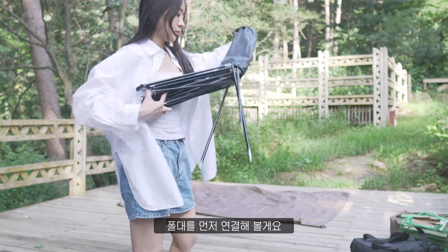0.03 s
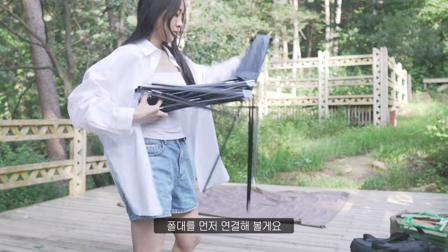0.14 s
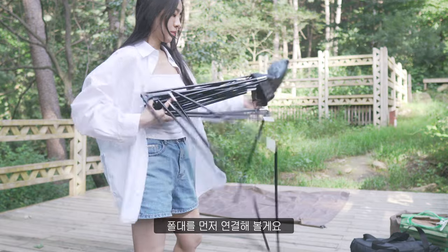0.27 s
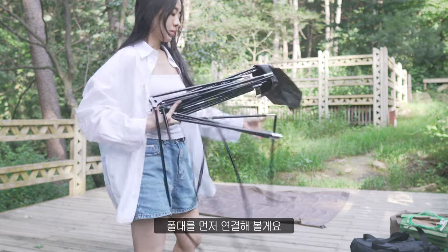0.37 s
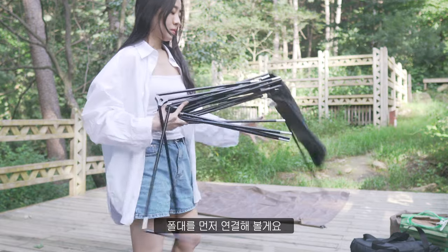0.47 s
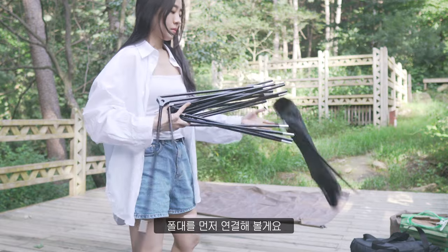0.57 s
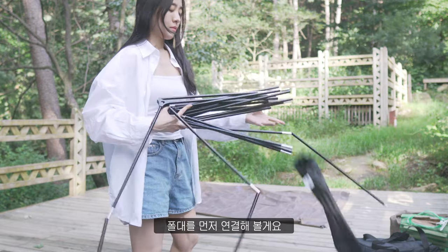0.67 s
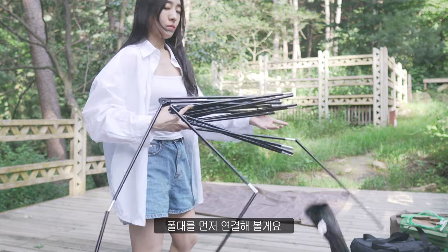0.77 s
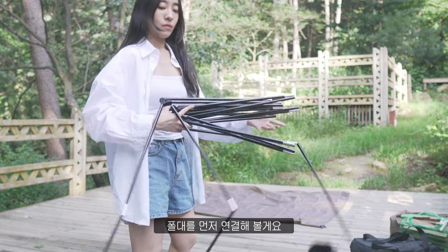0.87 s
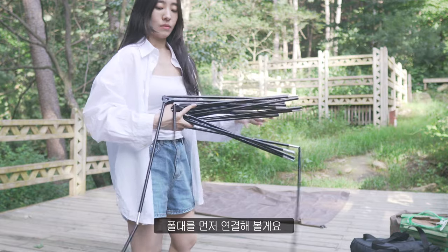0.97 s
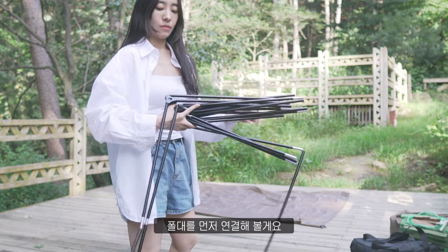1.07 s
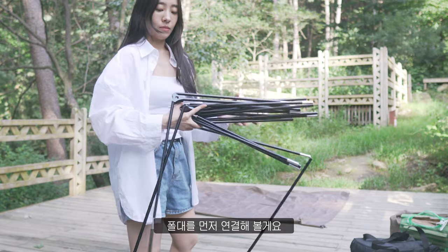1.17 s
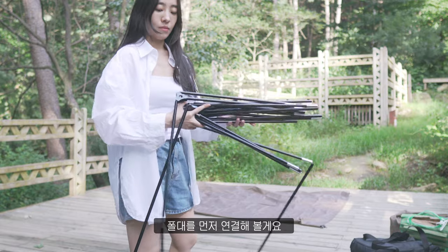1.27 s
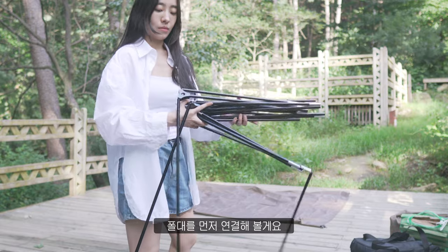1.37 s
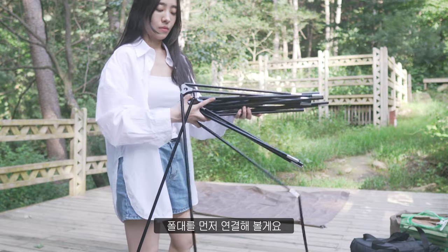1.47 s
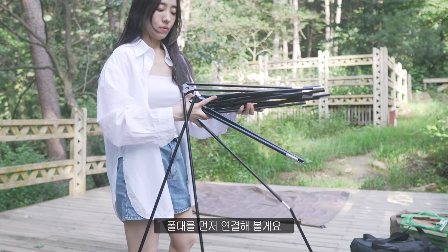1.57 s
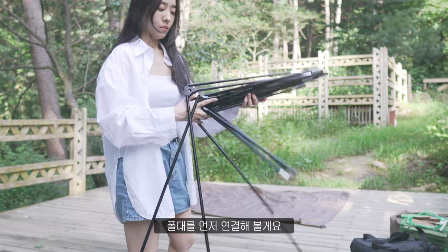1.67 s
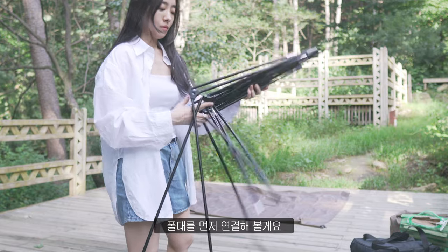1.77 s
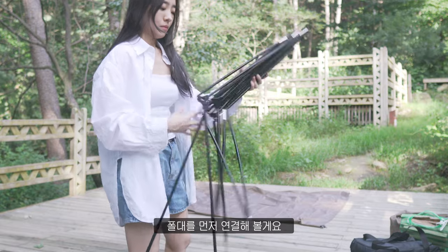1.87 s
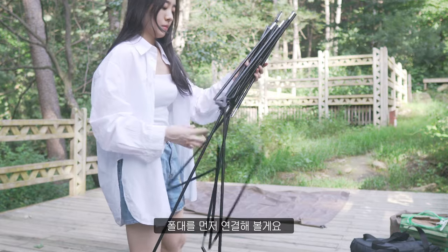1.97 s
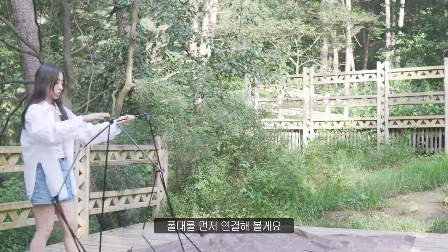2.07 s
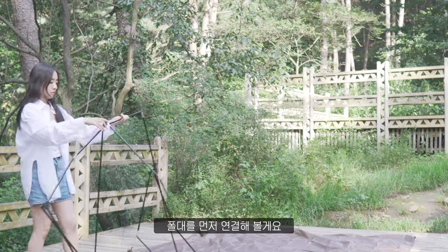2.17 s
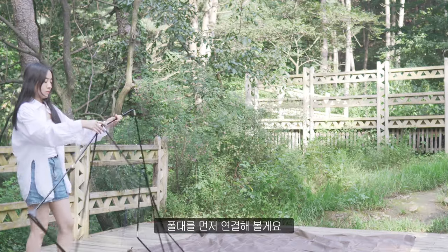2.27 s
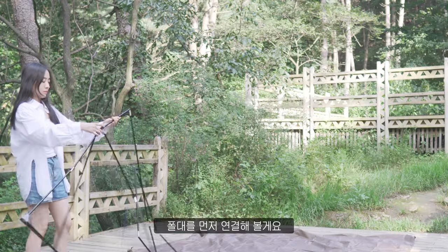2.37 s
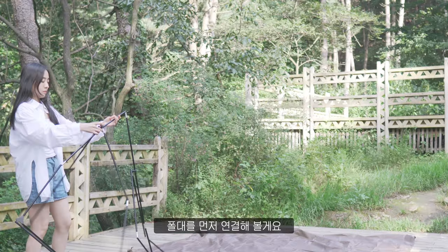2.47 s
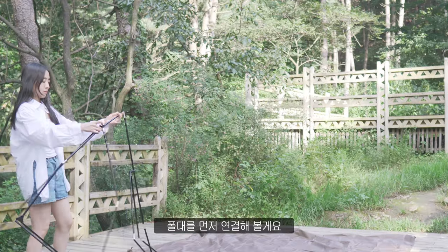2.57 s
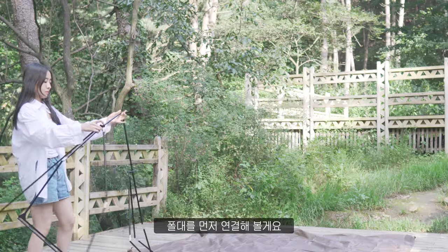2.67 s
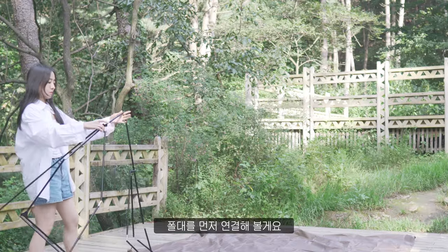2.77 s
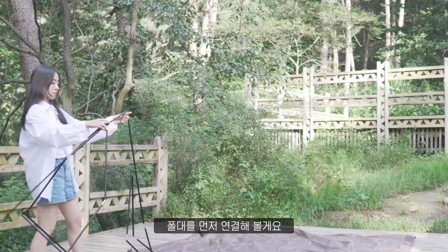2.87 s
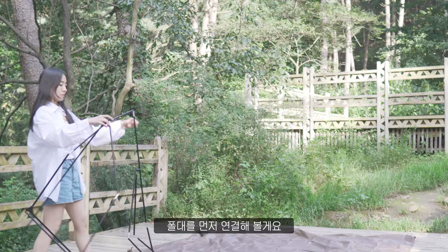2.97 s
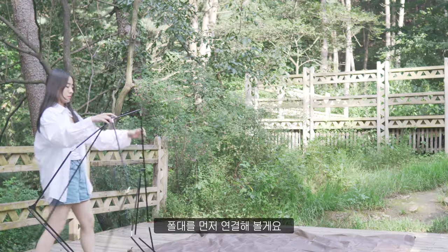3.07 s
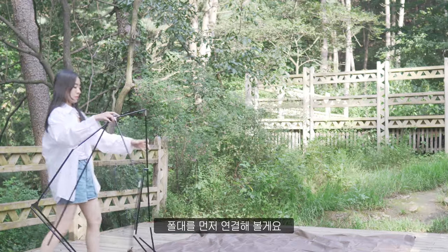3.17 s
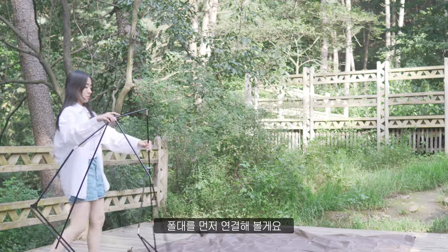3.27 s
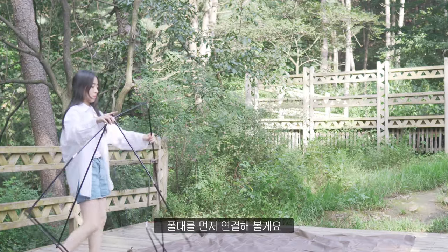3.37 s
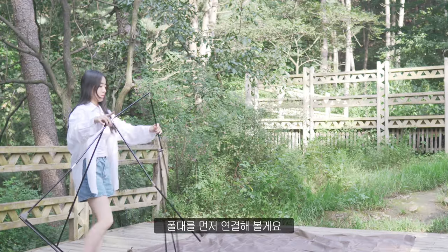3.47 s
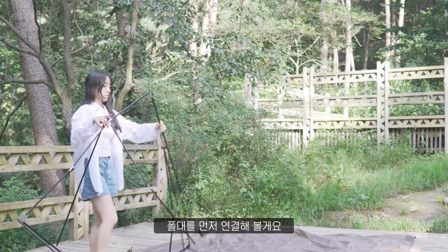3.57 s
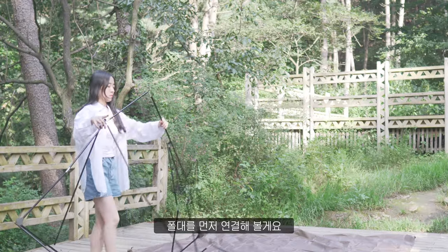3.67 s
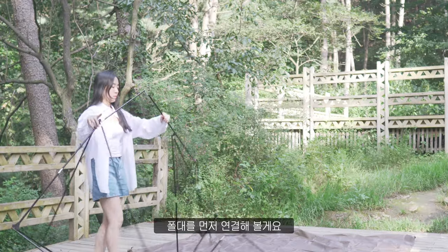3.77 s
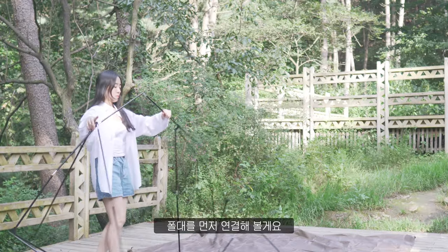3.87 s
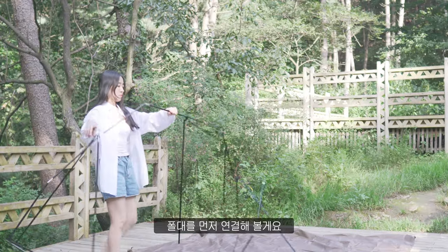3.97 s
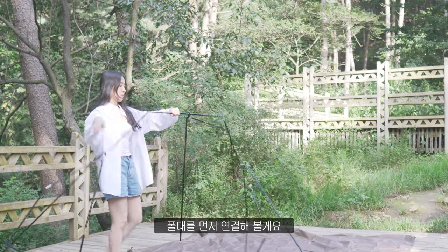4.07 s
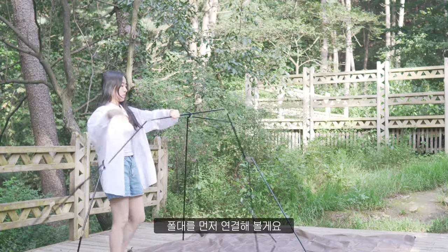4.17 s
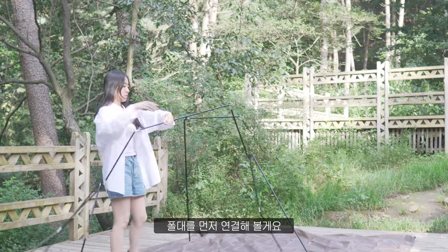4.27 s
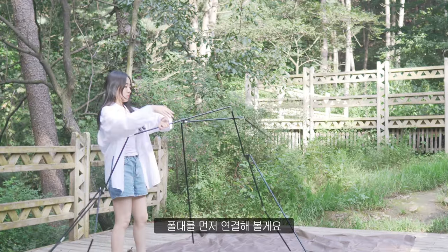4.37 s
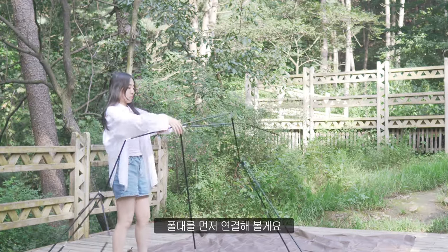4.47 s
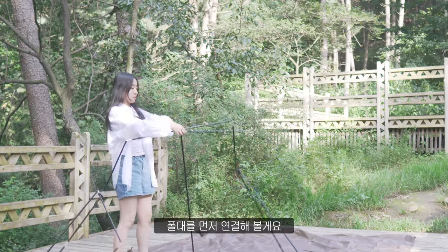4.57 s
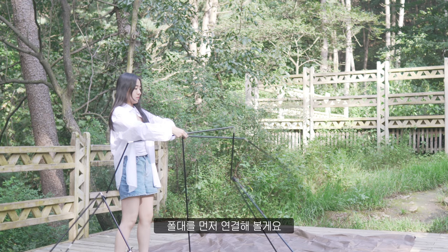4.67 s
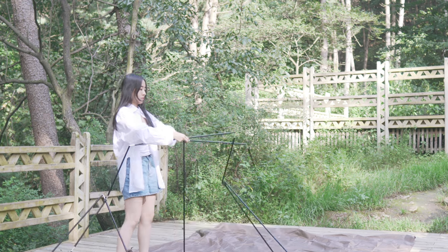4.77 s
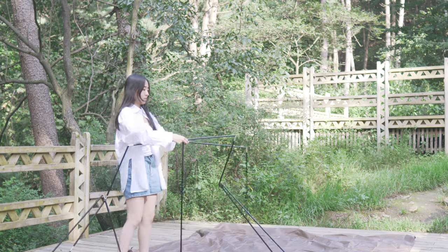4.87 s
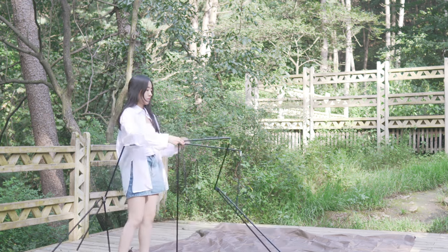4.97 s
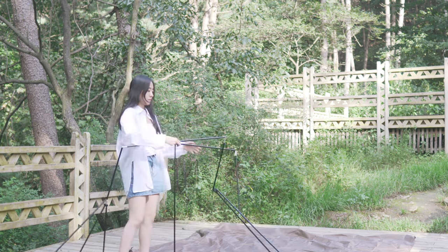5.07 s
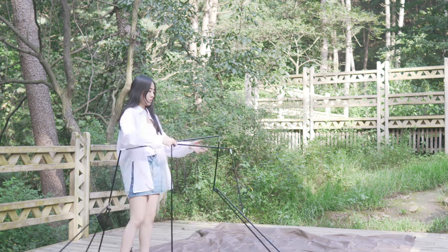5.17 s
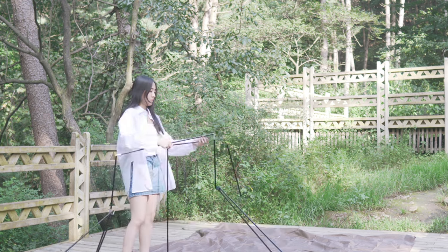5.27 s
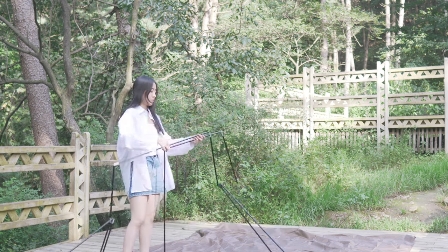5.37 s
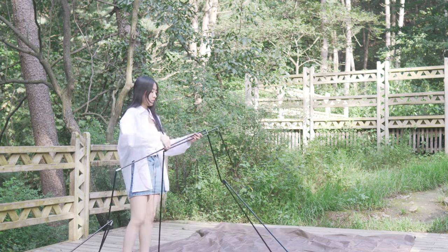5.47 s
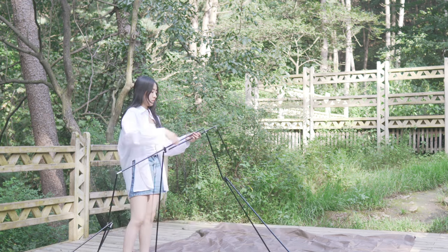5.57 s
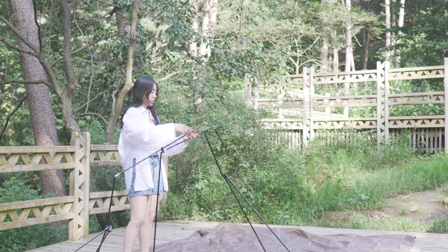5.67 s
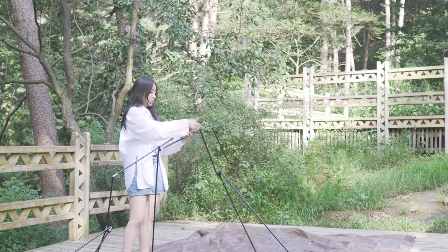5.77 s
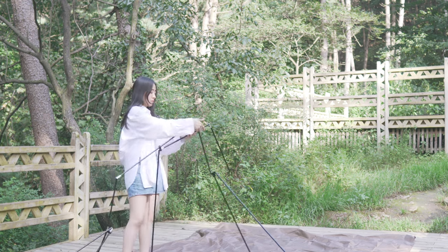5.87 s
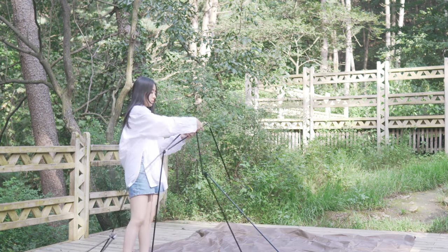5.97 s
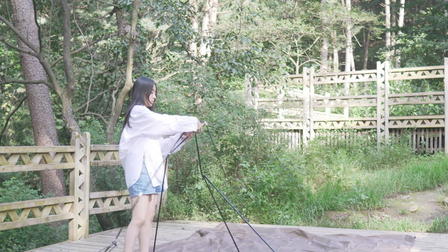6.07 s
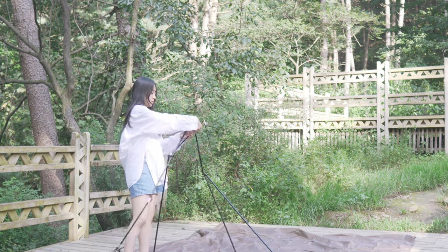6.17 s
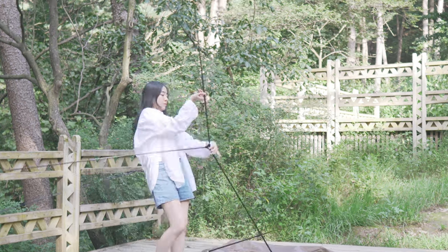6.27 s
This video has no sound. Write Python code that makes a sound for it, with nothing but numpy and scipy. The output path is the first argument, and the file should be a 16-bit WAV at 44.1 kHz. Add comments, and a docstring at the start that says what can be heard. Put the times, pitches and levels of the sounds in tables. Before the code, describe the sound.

Close, dry outdoor sound of metal tent poles being shaken out over a wooden deck. A dense rattle of bright clicks builds to a hard crack with a boards thump near half a second, then separate sharp snaps. Small ticks and scraping follow, then a near-quiet gap. Snaps return after three seconds, cluster busily past four, and thin out over soft hiss.

```python
"""A wooden deck in a wood: aluminium tent poles on a shock cord are shaken out and snapped together.
Tubes click in bursts of tilted noise and decaying sines; pole ends knock on the boards, ringing their modes
over a rough thud. Loose rattle and dragging are dense noise grains. Blows and steps boom the deck as a
drifting low sine with rumble. A faint thin tone passes, soft broad hiss lies behind, and the loudest
blows overload the recorder."""
import sys
import numpy as np
from scipy import signal
from scipy.fft import rfft, irfft
from scipy.io import wavfile
from scipy.ndimage import uniform_filter1d

SR = 44100
rng = np.random.default_rng(int(sys.argv[2]) if len(sys.argv) > 2 else 0)


def put_to_file(sound):
    """Save the sound as 16-bit audio at rate SR, in the file named by the first command-line argument."""
    columns = np.atleast_2d(sound).T  # one column per channel
    safe = np.clip(columns, -1, 1)
    whole_steps = np.round(safe * 32767)
    wavfile.write(sys.argv[1], SR, whole_steps.astype(np.int16))


N = 279594  # samples

# Tube against tube: start_s, strength_db (relative), strongest_ring_hz, brightness_db (tilt of the treble),
# decay_t60_s (at least 0.008 is used), long_ring_db (relative to the click)
TUBE_CLICKS = [(0.0316, -29, 7330, 4, 0.029, -42), (0.0466, -37, 2970, -15.5, 0.067, -42),
               (0.096, -30, 4540, -5, 0.05, -42), (0.104, -24, 2750, -25, 0.16, -42),
               (0.142, -19, 3340, -16, 0.056, -42), (0.1598, -17, 4080, -11, 0.026, -42),
               (0.1915, -8.5, 5300, 0, 0.024, -23), (0.2055, -10, 5100, -13, 0.024, -25),
               (0.2377, -8, 7150, -2, 0.026, -42), (0.247, -19, 12000, -5, 0.088, -42),
               (0.267, -19.5, 7900, -11, 0.029, -42), (0.301, -20.5, 12530, -12, 0.18, -42),
               (0.3091, -4.5, 6870, 3.5, 0.021, -46), (0.3271, -9, 4860, -2, 0.018, -42),
               (0.3415, -2.5, 13400, -1, 0.033, -60), (0.3645, -2, 10300, -2.5, 0.028, -30.5),
               (0.3825, -16.5, 8700, -6, 0.14, -42), (0.3945, -10, 7000, -7, 0.043, -42),
               (0.4068, -14, 6480, 4, 0.056, -42), (0.42, -26, 5000, -2, 0.037, -42),
               (0.434, -16, 10200, 0, 0.052, -42), (0.4542, -5.5, 6900, -7, 0.013, -36),
               (0.462, -8, 9800, 0, 0.013, -42), (0.486, -8, 6900, -2.5, 0.032, -49),
               (0.5466, -24.5, 2180, -10, 0.23, -42), (0.5694, 3, 12570, -2.5, 0.087, -42),
               (0.582, 7.5, 8180, 5, 0.041, -36), (0.592, -5, 8800, -3, 0.055, -25),
               (0.6666, -9, 9500, 2.5, 0.037, -29), (0.7228, -20.5, 7260, -9, 0.031, -40),
               (0.8105, -36, 9000, 1, 0.03, -42), (0.827, -31.5, 2560, -2, 0.089, -42),
               (0.856, -24, 6700, -9, 0.03, -42), (0.9238, -19, 3900, -4, 0.1, -42),
               (0.9368, 4, 4600, -7, 0.037, -46), (0.944, -1.5, 8230, -2, 0.031, -29),
               (0.9716, -5.5, 3900, -4, 0.032, -42), (1.009, -22, 2650, -2, 0.029, -42),
               (1.067, -20, 4920, -7, 0.14, -42), (1.0765, -16, 5670, -3.5, 0.091, -42),
               (1.123, -24.5, 4100, -7, 0.11, -44), (1.1449, -29, 6000, -6, 0.035, -40),
               (1.1868, 1.5, 14500, 2, 0.052, -44), (1.191, -2.5, 10040, -1, 0.033, -29.5),
               (1.248, -23, 8400, -3, 0.052, -42), (1.3744, -25, 5760, 3, 0.024, -42),
               (1.413, -27, 7040, 4, 0.12, -34), (1.4292, 8, 12220, 2, 0.021, -55),
               (1.453, -9.5, 7300, -4, 0.034, -44), (1.472, -22, 4610, -14, 0.037, -42),
               (1.5711, -17.5, 14000, -7, 0.033, -45), (1.6728, -30.5, 6750, -7, 0.07, -42),
               (1.6927, -23, 4800, -11, 0.023, -42), (1.707, -17.5, 4170, -7, 0.018, -44),
               (1.7179, -14.5, 6180, -10, 0.034, -45), (1.8035, -29.5, 4370, -6, 0.18, -42),
               (1.814, -31, 3380, -6, 0.077, -42), (1.868, -14, 6000, -2, 0.068, -42),
               (1.8973, -20, 12100, -9, 0.02, -42), (1.9808, -5, 6550, -4, 0.014, -47),
               (1.9889, -9.5, 7640, -1, 0.062, -44), (1.996, -8, 4990, -10, 0.064, -44),
               (2.0409, -11.5, 4030, 5, 0.046, -42), (2.0618, -25.5, 5950, -7, 0.053, -42),
               (2.0836, -32, 2630, 1, 0.06, -42), (2.104, -32, 6040, 0, 0.027, -42),
               (2.117, -25, 6200, -4, 0.047, -26), (2.2344, -22, 7200, 3, 0.029, -42),
               (2.243, -18, 4730, -11, 0.016, -42), (2.27, -9, 6380, -12, 0.013, -45),
               (2.2873, -13.5, 8130, 0, 0.017, -42), (2.3076, -25, 4800, -3, 0.033, -42),
               (2.33, -19.5, 4870, 4, 0.024, -42), (2.3947, -9, 2920, -10, 0.022, -42),
               (2.404, -22, 12700, -2, 0.097, -42), (2.4113, -16, 7000, -14, 0.024, -47),
               (2.453, -18.5, 5030, -2, 0.029, -42), (2.4674, -27, 11740, -14, 0.12, -42),
               (2.48, -17.5, 4110, -7, 0.028, -42), (2.51, -28.5, 3460, -14, 0.048, -42),
               (2.5694, -24, 4800, -3, 0.069, -42), (2.6155, -28, 7740, -4, 0.036, -42),
               (2.729, -22, 5450, -15, 0.016, -39), (3.0098, -12, 4010, 0, 0.054, -35),
               (3.0367, -20.5, 5640, -15, 0.022, -42), (3.118, -38, 6000, -10, 0.02, -42),
               (3.379, -36, 8100, 0, 0.069, -42), (3.399, -28, 4500, -10, 0.062, -42),
               (3.4084, 2.5, 6580, -7, 0.03, -36), (3.43, -17.5, 2840, -4, 0.042, -42),
               (3.46, -28, 6700, -4, 0.078, -42), (3.469, -21, 4940, -14, 0.025, -42),
               (3.482, -13.5, 10600, -4, 0.047, -42), (3.5225, -26, 3100, -1, 0.047, -42),
               (3.5415, -35, 2990, -13, 0.1, -42), (3.5525, -18, 2900, -3, 0.064, -37),
               (3.5555, -18, 3100, -6, 0.046, -42), (3.575, -33, 7260, -15, 0.14, -48),
               (3.5867, -2.5, 6430, 4.5, 0.021, -36), (3.6304, -34, 11650, 6, 0.09, -27),
               (3.6695, -31, 6550, -9, 0.026, -42), (3.7153, -32.5, 7400, -9, 0.044, -40),
               (3.81, -41, 14000, 9, 0.015, -42), (3.826, -32, 13900, 9, 0.015, -42),
               (3.8843, -6, 10100, 8, 0.019, -31.5), (3.9084, -24.5, 4960, -9, 0.047, -42),
               (3.9327, -36, 9000, 4, 0.06, -42), (3.9741, -34, 7690, -9, 0.1, -42),
               (3.9887, -17, 12580, -8, 0.025, -42), (4.0042, -5.5, 6800, 3.5, 0.028, -29.5),
               (4.1451, -1.5, 8300, 13, 0.018, -31), (4.154, -13, 12600, 5, 0.039, -42),
               (4.172, -30, 8310, -5, 0.023, -42), (4.211, -15.5, 7030, -3, 0.04, -44),
               (4.2267, -16, 5660, -5, 0.062, -42), (4.2707, -14.5, 7770, 4, 0.023, -29),
               (4.3613, -7, 10600, -13, 0.024, -26), (4.3754, -13, 7840, 3, 0.098, -41),
               (4.385, -10, 7500, -4, 0.036, -42), (4.3969, -14, 4310, -5, 0.066, -42),
               (4.4214, -20, 8100, 0, 0.06, -42), (4.4338, -2, 3140, 1, 0.073, -42),
               (4.4543, -2.5, 10030, -4, 0.03, -42), (4.465, -1.5, 6670, -5, 0.04, -24.5),
               (4.482, -14, 5000, -7, 0.11, -42), (4.5728, -20, 9800, 0, 0.054, -42),
               (4.596, -4.5, 6370, -1, 0.13, -53), (4.648, -21, 12500, -1, 0.11, -42),
               (4.681, -13.5, 8030, 1, 0.066, -42), (4.6915, -4, 8550, 13, 0.015, -27.5),
               (4.7152, -14.5, 14100, 0, 0.042, -38), (4.9863, -4.5, 3390, 3.5, 0.039, -27),
               (5.0047, -24, 6500, -1, 0.072, -42), (5.0324, -26, 13440, 1, 0.087, -42),
               (5.2917, -17, 6670, -5, 0.031, -42), (5.3257, -17.5, 5570, -4, 0.041, -44),
               (5.3549, -22, 8700, -6, 0.023, -42), (5.3733, -36, 5170, -4, 0.05, -42),
               (5.3873, -26.5, 10300, -1, 0.047, -42), (5.412, -35, 4610, -7, 0.087, -42),
               (5.438, -12, 11800, 2.5, 0.1, -42), (5.4736, -28, 9820, -7, 0.11, -42),
               (5.5075, -24, 8800, -10, 0.039, -42), (5.5225, -20, 10160, 2, 0.036, -44),
               (5.575, -33, 8950, -2, 0.03, -42), (5.7144, -32.5, 2530, -10, 0.099, -42),
               (5.753, -33, 4270, -2, 0.072, -42), (6.0118, -33.5, 4130, -3, 0.16, -42),
               (6.081, -23.5, 4220, -14, 0.03, -42), (6.101, -29.5, 5710, -9, 0.035, -42),
               (6.14, -18, 12050, -5, 0.041, -42), (6.2734, -20.5, 2290, -3, 0.024, -42)]
# Pole ends on the boards: start_s, strength_db (relative), strongest_ring_hz,
# decay_t60_s (at least 0.02 is used), thud_db (relative to the ring)
BOARD_KNOCKS = [(0.507, -27, 975, 0.049, 1), (0.545, -26, 590, 0.097, 3), (0.571, -0.5, 710, 0.069, 0),
                (0.59, -3.5, 1178, 0.053, -28), (0.77, -24.5, 1470, 0.059, -3),
                (0.827, -17.5, 632, 0.069, -1.5), (0.936, -7, 627, 0.062, 5),
                (0.938, -5.5, 2250, 0.028, 6.5), (1.006, -25, 1020, 0.096, 8), (1.228, -21, 477, 0.096, -2),
                (1.427, -25, 1455, 0.1, 3), (3.409, -25, 749, 0.21, 4.5), (3.518, -26, 1066, 0.095, -16),
                (3.552, -19.5, 590, 0.081, 4), (4.104, -24, 432, 0.027, 5), (4.1453, -5.5, 413, 0.031, 3),
                (4.146, -10.5, 1480, 0.019, 4), (4.24, -20.5, 413, 0.083, 1), (4.372, -5, 821, 0.089, -2.5),
                (4.432, 2, 1348, 0.053, 2), (4.433, -4, 2660, 0.043, -5), (4.464, -15, 815, 0.056, 6.5),
                (4.595, -10.5, 1280, 0.025, 2), (4.619, -8.5, 1206, 0.046, -1),
                (4.682, -15.5, 650, 0.044, 6), (4.712, -8.5, 625, 0.035, 6), (4.765, -23, 624, 0.065, 2.5),
                (5.4375, -4, 704, 0.032, 3), (5.439, -17, 2380, 0.03, -1), (5.445, -15.5, 182, 0.06, -2),
                (5.488, -23, 194, 0.065, 6), (5.528, -24, 540, 0.07, 8.5), (5.714, -24, 936, 0.084, 6),
                (6.137, -9, 467, 0.06, -8.5), (6.273, -18.5, 907, 0.053, -1.5)]


def undb(db):
    """Turn decibels into an amplitude factor."""
    return 10 ** (np.asarray(db) / 20)


def level(x, db):
    """Scale x by its RMS: a signal of RMS 1 is 0 dB."""
    return x * undb(db) / np.sqrt(np.mean(x ** 2))


def colour(x, points):
    """Shape the spectrum of x by (Hz, dB) points joined on a log frequency axis."""
    hz, db = np.transpose(points)
    f = np.maximum(np.fft.rfftfreq(len(x), 1 / SR), 1)
    gain = undb(np.interp(np.log(f), np.log(hz), db))
    return irfft(rfft(x) * gain, len(x))


def fade(t, t60):
    """Exponential decay that falls 60 dB in t60 seconds."""
    return np.exp(-np.log(1000) * t / t60)


def rings(t, hz, db, t60, phase):
    """Sum of decaying sines, one for each mode."""
    decay = undb(db)[:, None] * fade(t, t60[:, None])
    return np.sum(decay * np.sin(2 * np.pi * hz[:, None] * t + phase[:, None]), axis=0)


def add(track, s, sound):
    """Mix a sound into the track at s seconds."""
    i = int(s * SR)
    track[i:i + len(sound)] += sound[:max(len(track) - i, 0)]


def walk(rate):
    """Random levels held for 1 / rate seconds, then smoothed twice."""
    k = int(SR / rate)
    steps = np.repeat(rng.standard_normal(N // k + 1), k)
    return uniform_filter1d(uniform_filter1d(steps, k), k)[:N]


def curve(table):
    """Join each column of a table over its times in seconds."""
    s, *columns = np.transpose(table)
    return [np.interp(np.arange(N) / SR, s, c) for c in columns]


def swells(rows, rise_s):
    """Summed level of (crest s, dB, t60 s) events: a rounded climb to the crest, then decay."""
    power = np.zeros(N)
    for s, db, t60 in rows:
        rise = np.sin(np.linspace(0, np.pi / 2, int(rise_s * SR))) ** 2
        decay = fade(np.arange(SR) / SR, max(t60, .02))
        add(power, s - rise_s, (undb(db) * np.r_[rise, decay]) ** 2)
    return np.sqrt(power)


def grains(per_s, spread_db, t60, points):
    """Dense random ticks of very uneven size, each a short coloured burst."""
    chance = rng.random((2, N))
    tick_power = (chance[0] < per_s / SR) * undb(-2 * spread_db * np.log(chance[1] + 1e-9))
    power_decay = fade(np.arange(2000) / SR, t60 / 2)
    envelope = np.sqrt(signal.fftconvolve(tick_power, power_decay)[:N].clip(0))
    return level(colour(envelope * rng.standard_normal(N), points), 0)


def clicks(main_db=-2, scatter_db=2, octave_db=8, snap_db=3, rise_s=0.00035):
    """A chattering contact shakes many short wall modes; one stands out at first, and a few ring on faintly."""
    # Long rings of a tube: pitch_hz, level_db (relative), decay_t60_s
    tube = np.array([(4240, 6, 0.16), (6840, 15, 0.086), (8130, 4.5, 0.32), (10150, 5.5, 0.27),
                     (12000, 2, 0.29), (14600, -2, 0.24)])
    # lows against the middle: for a 0 dB click ringing at 6 kHz, change per octave of ring, per dB of strength
    lows_db, lows_db_per_octave, lows_per_db = -5.5, -3, -0.03
    out, t = np.zeros(N), np.arange(6000) / SR
    for s, db, hz, high_db, t60, long_db in TUBE_CLICKS:
        low_db = lows_db + lows_db_per_octave * np.log2(hz / 6000) + lows_per_db * db
        t60 = max(t60, .008)
        tilt = [(400, low_db - 23), (1500, low_db - 7), (2800, low_db + 1.5),
                (6000, 0), (12000, high_db - 0.5), (16000, high_db - 8.5)]
        noise, chance = rng.standard_normal((2, len(t))), rng.standard_normal((2, len(tube)))
        snap = undb(snap_db) * fade(t, 0.00097)
        crack = level(colour(noise[0], tilt), 0) * (fade(t, t60) + snap)
        # neighbouring tubes touch and let go, so the tones flutter
        flutter = level(uniform_filter1d(noise[1], size=110), 0)
        main = undb(main_db) * np.sin(2 * np.pi * hz * t + .5 * flutter) * fade(t, min(t60, .03))
        # long rings far from the strongest pitch are weaker
        reach_db = -octave_db * np.abs(np.log2(tube[:, 0] / hz))
        ring_hz = tube[:, 0] * (1 + .015 * chance[0])
        ring_db = long_db + reach_db + tube[:, 1] + scatter_db * chance[1]
        long = rings(t, ring_hz, ring_db, tube[:, 2], chance[1])
        click = crack + main + long * (0.42 + flutter)
        add(out, s, undb(db - 3.5) * click * (1 - np.exp(-t / rise_s)))
    return out


def knocks(main_db=5, scatter_db=2, octave_db=8, rise_s=0.0014):
    """Each blow rings the board modes, most those near its own pitch, over a rough thud."""
    # Board modes: pitch_hz, level_db (relative), decay_t60_s (for a knock whose own t60 is 0.1 s)
    boards = np.array([(130, -5, 0.26), (182, -3, 0.49), (334, 12, 0.049), (469.6, -0.5, 0.17),
                       (631.4, -1, 0.16), (867, -3, 0.16), (1070, 5, 0.044), (1250, -14, 0.13),
                       (1850, -27, 0.017)])
    out, t = np.zeros(N), np.arange(9000) / SR
    for s, db, hz, t60, rough_db in BOARD_KNOCKS:
        t60 = max(t60, .02)
        chance = rng.standard_normal((3, len(boards)))
        reach_db = -octave_db * np.abs(np.log2(boards[:, 0] / hz))
        mode_hz = boards[:, 0] * (1 + 0.0655 * chance[0])
        mode_db = boards[:, 1] + reach_db + scatter_db * chance[1]
        wood = rings(t, mode_hz, mode_db, boards[:, 2] * t60 * 10, chance[2])
        spot = undb(main_db) * np.sin(2 * np.pi * hz * t) * fade(t, t60)
        thud_tilt = [(60, -30), (hz / 3, -6), (hz, 0), (hz * 1.74, -4), (hz * 3, -14), (6000, -30)]
        thud = level(colour(rng.standard_normal(len(t)), thud_tilt), rough_db)
        blow = wood + spot + thud * (fade(t, 2.1 * t60) + 3.15 * fade(t, 0.011))
        add(out, s, undb(db - 12.5) * blow * (1 - np.exp(-t / rise_s)))
    return out


def handling():
    """Loose tubes tick together and pole ends scrape the boards; hard clicks and all knocks make them flare."""
    # Steady handling: time_s, loose_tubes_db, dragging_ends_db
    handling_levels = [(0.0, -41, -54), (0.156, -41.5, -48.5), (0.304, -47, -48.5), (0.388, -29, -42.5),
                       (0.56, -47, -50), (0.85, -42.5, -43.5), (1.09, -51, -42), (1.52, -53, -43),
                       (1.76, -46.5, -67), (1.92, -46, -45.5), (2.1, -72, -48), (2.26, -40.5, -40),
                       (2.42, -44, -37.5), (2.68, -57, -43.5), (3.35, -77, -55.5), (3.56, -35.5, -46),
                       (3.75, -62, -45.5), (3.91, -45, -42), (4.26, -51, -48), (4.75, -42, -46),
                       (5.064, -61, -46), (5.4, -41, -43), (5.568, -48, -39.5), (5.85, -86, -45),
                       (6.058, -39.5, -43.5), (6.34, -48, -54)]
    # after a blow the bundle rattles and the ends skid on: level against the blow, decay
    rattle_db, rattle_t60_s, skid_db, skid_t60_s = -29, 0.15, -23.5, .28
    flare_s = 0.01  # rise time
    jostle_db, drag_db = curve(handling_levels)
    hard_clicks = [(s + flare_s, db + rattle_db, rattle_t60_s) for s, db, *_ in TUBE_CLICKS if db > -12]
    rattle = swells(hard_clicks, flare_s)
    skid = swells([(s + flare_s, db + skid_db, skid_t60_s) for s, db, *_ in BOARD_KNOCKS], flare_s)
    jostle = grains(300, 2.3, 0.034, [(800, -13), (2500, 8), (5000, 7), (10000, 1.5), (15000, -14)])
    drag = grains(200, 0.33, 0.061, [(90, -3.0), (250, 0.5), (600, 4), (1200, -0.5), (3000, -25.5)])
    return np.hypot(undb(jostle_db), rattle) * jostle + np.hypot(undb(drag_db), skid) * drag


def boom(rumble_db=-9):
    """The lowest mode of the deck drifts in pitch as weight shifts; a rumble of the joists goes with it."""
    # Blows and steps on the deck: crest_s, level_db, decay_t60_s
    deck_booms = [(0.35, -61, .3), (0.62, -18.5, 0.32), (0.72, -37, 0.37), (0.865, -36.5, 0.33),
                  (0.975, -31.5, .5), (1.04, -34, 0.52), (1.13, -47, 0.49), (1.27, -44, .3),
                  (1.38, -50, .5), (1.48, -47, .5), (1.58, -56, .3), (1.99, -71, .3), (2.49, -45, 0.2),
                  (2.65, -52, 0.97), (3.41, -61, .4), (3.6, -51, .6), (3.74, -47, 0.18), (3.95, -56, .5),
                  (4.08, -58, .3), (4.2, -31, 0.79), (4.29, -39, .3), (4.41, -55, 0.25),
                  (4.54, -34.5, 0.17), (4.75, -37, 0.32), (5.2, -56, .4), (5.51, -29, 0.38),
                  (5.62, -40, .4), (5.79, -37.5, .25), (5.9, -43, 0.28), (6.24, -50, .6)]
    boom_hz, swell_s, still_db = 79, 0.048, -78.5  # centre pitch, climb to the crest, level between booms
    hz = boom_hz * (1 + 0.0353 * walk(12))
    tone = np.sqrt(2) * np.sin(2 * np.pi * np.cumsum(hz) / SR)
    rumble_tilt = [(15, -47), (35, -35), (52, -13), (70, -1.5), (130, -16), (300, -47)]
    rumble = level(colour(rng.standard_normal(N), rumble_tilt), rumble_db)
    return np.hypot(undb(still_db), swells(deck_booms, swell_s)) * (tone + rumble)


def thin_tone():
    """A faint sine of steady pitch comes and goes softly among the rattles."""
    # One tone: start_s, end_s, pitch_hz, level_db (RMS at its full middle)
    start, end, hz, db = (2.28, 2.365, 3500, -43)
    t, out = np.arange(int((end - start) * SR)) / SR, np.zeros(N)
    envelope = signal.windows.tukey(len(t), .5)
    add(out, start, np.sqrt(2) * undb(db) * envelope * np.sin(2 * np.pi * hz * t))
    return out


def hiss():
    """Smooth broad noise, dulled toward the treble, whose level wanders a little."""
    # Hiss spectrum: pitch_hz, density_db (relative, per Hz)
    hiss_tilt = [(20, -44), (40, -26), (70, -20), (120, -11), (200, -10), (330, -3), (500, 0), (1000, -2),
                 (2000, -5), (4400, -7), (4900, -13), (8700, -15), (9300, -19), (15500, -25), (15900, -50)]
    noise = colour(rng.standard_normal(N), hiss_tilt)
    return level(noise * undb(0.25 * walk(1.34)), -42)


def echo(near):
    """Boards, fence and trunks scatter a short dull tail back."""
    t = np.arange(16000) / SR
    noise = colour(rng.standard_normal(len(t)), [(100, 22), (700, 0.5), (5000, -3.5), (15000, -9)])
    tail = noise * fade(t, 0.36) * (1 - np.exp(-t / 0.00057))
    return signal.fftconvolve(near, tail / np.sqrt(np.sum(tail ** 2)))[:N]


def scene():
    """Clicks and knocks with their echo, over handling, deck boom, thin tone and hiss."""
    near = clicks() + knocks()
    return (near + undb(-14.5) * echo(near) + handling() + boom() + thin_tone() + hiss())[None]


def record(dry):
    """The microphone loses the deepest bass; the loudest blows hit the ceiling; the top is cut."""
    mic_low_hz, top_hz = 40.8, 16200
    heard = signal.sosfilt(signal.butter(2, mic_low_hz, "high", fs=SR, output="sos"), dry)
    clipped = np.clip(heard, -.95, .95)
    return signal.sosfilt(signal.ellip(10, .2, 70, top_hz, fs=SR, output="sos"), clipped)


dry = scene()
out = record(dry)
put_to_file(out)
```